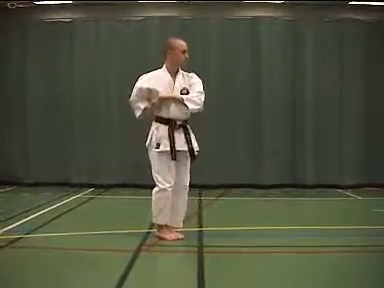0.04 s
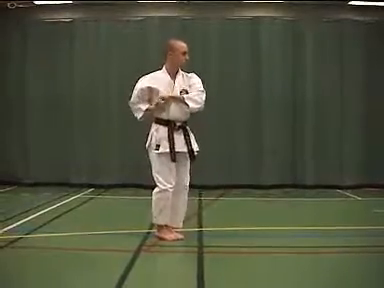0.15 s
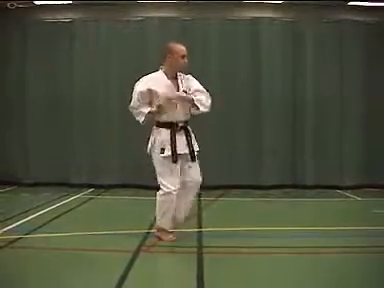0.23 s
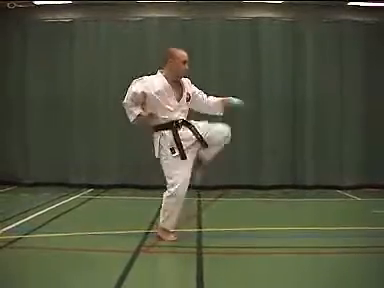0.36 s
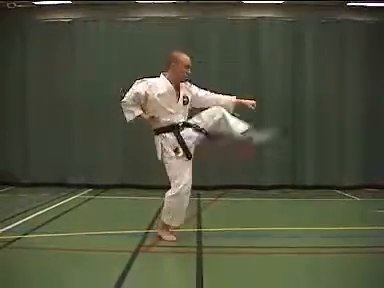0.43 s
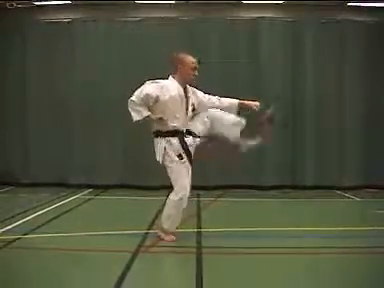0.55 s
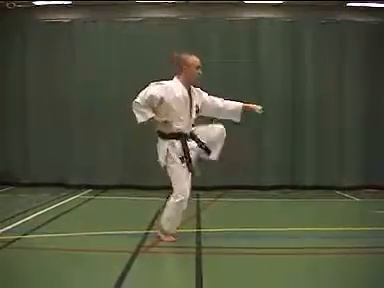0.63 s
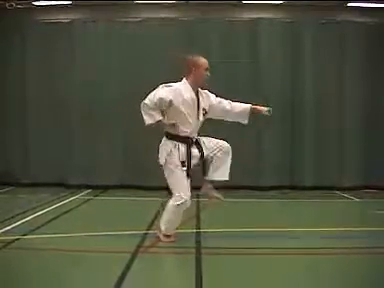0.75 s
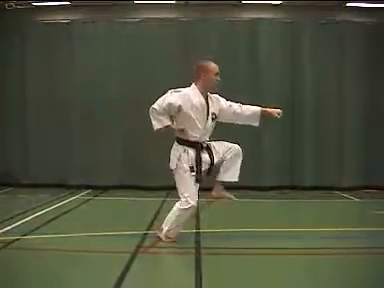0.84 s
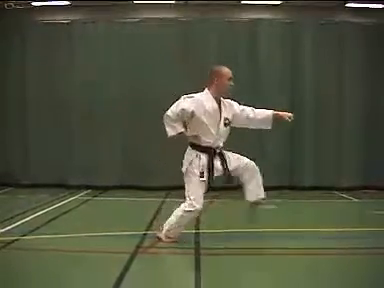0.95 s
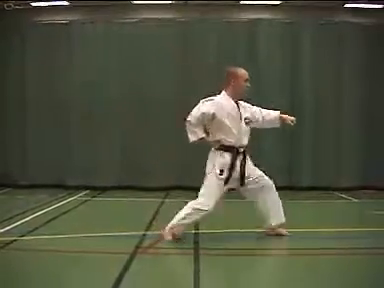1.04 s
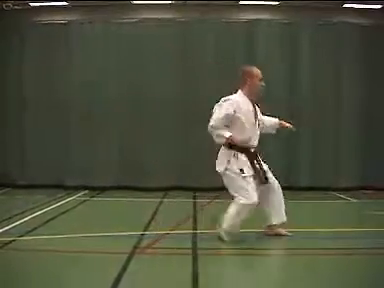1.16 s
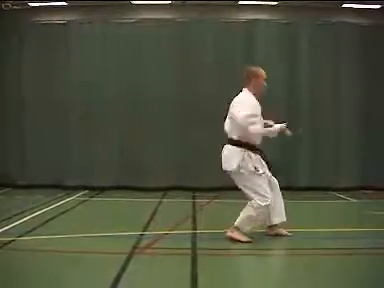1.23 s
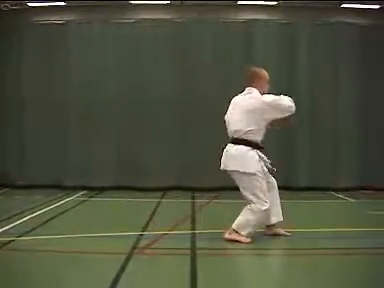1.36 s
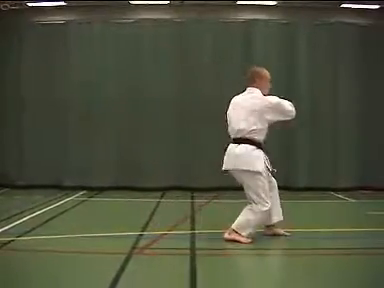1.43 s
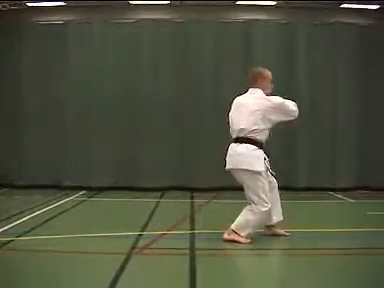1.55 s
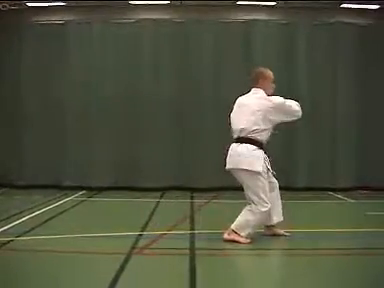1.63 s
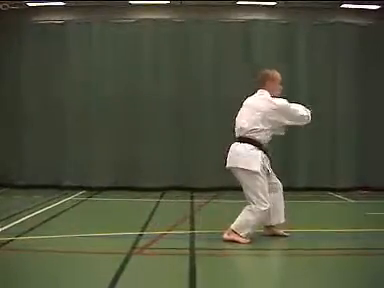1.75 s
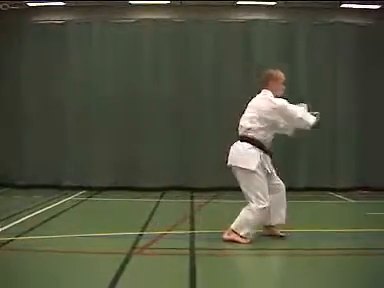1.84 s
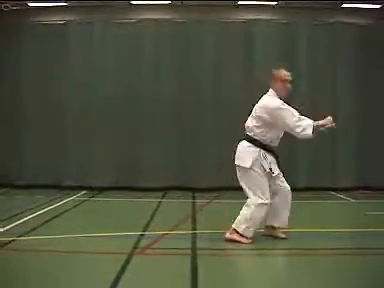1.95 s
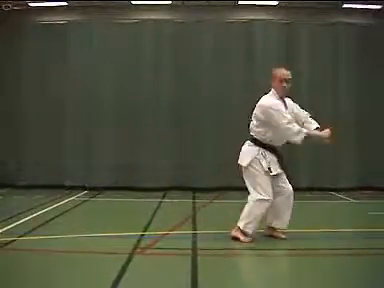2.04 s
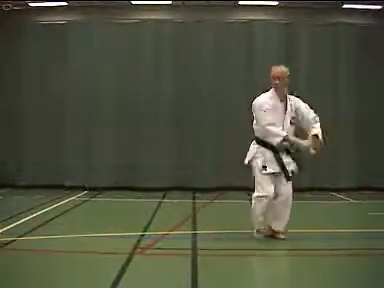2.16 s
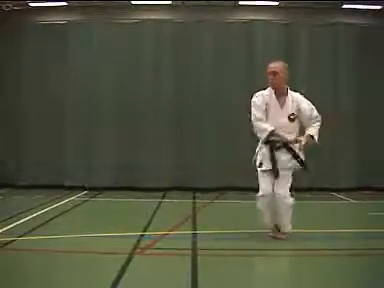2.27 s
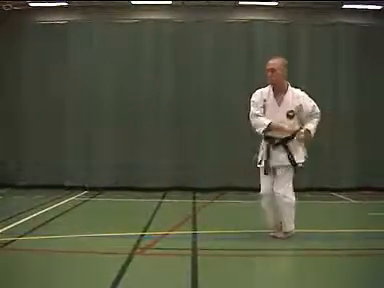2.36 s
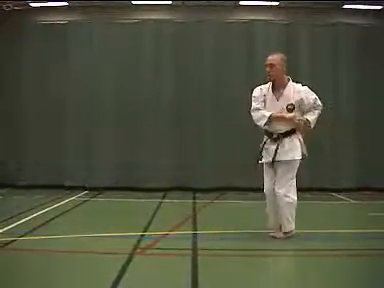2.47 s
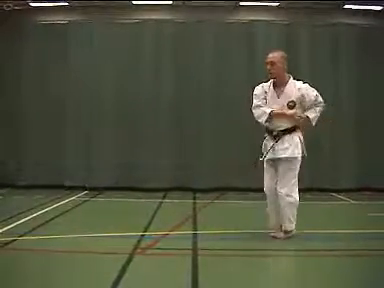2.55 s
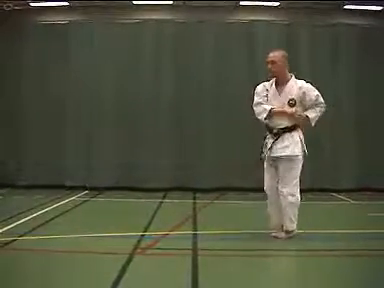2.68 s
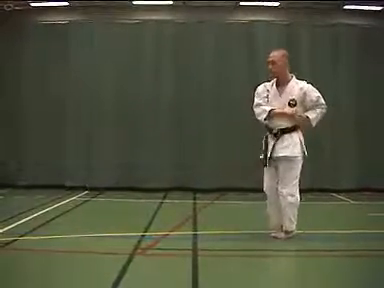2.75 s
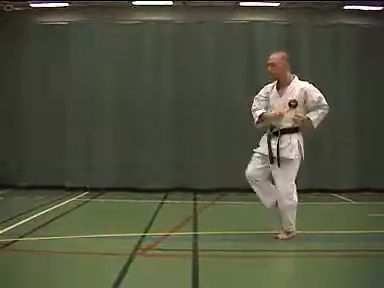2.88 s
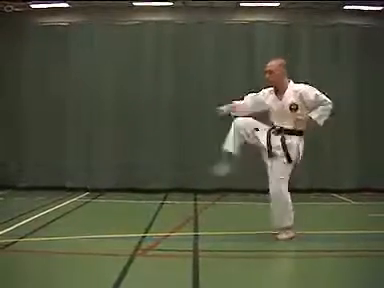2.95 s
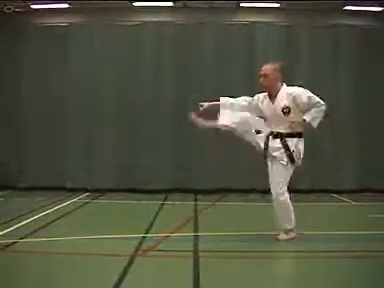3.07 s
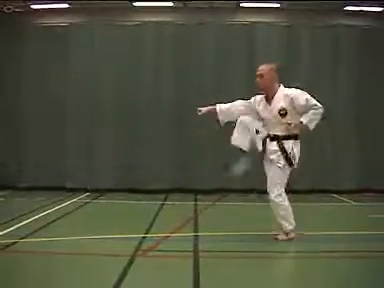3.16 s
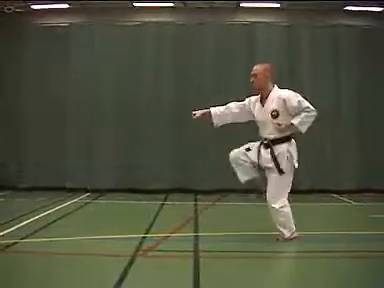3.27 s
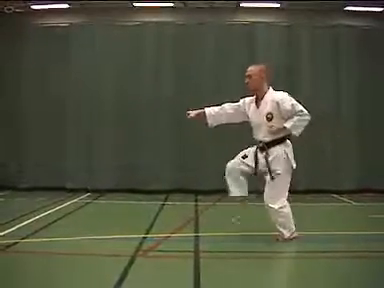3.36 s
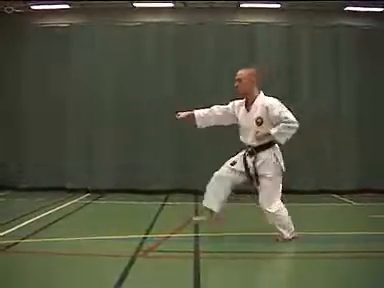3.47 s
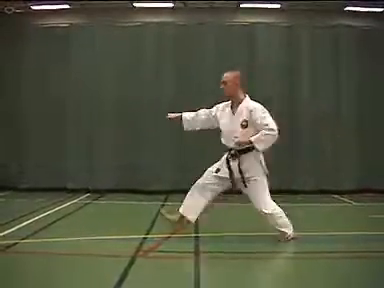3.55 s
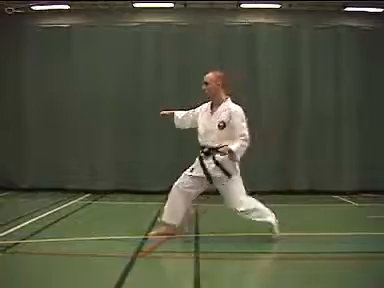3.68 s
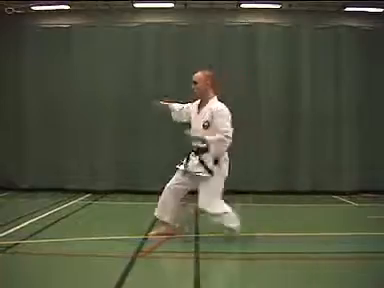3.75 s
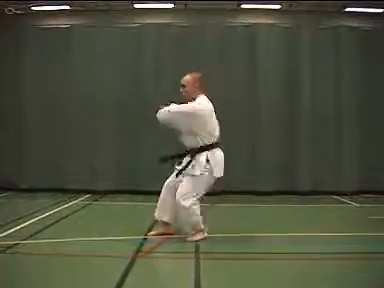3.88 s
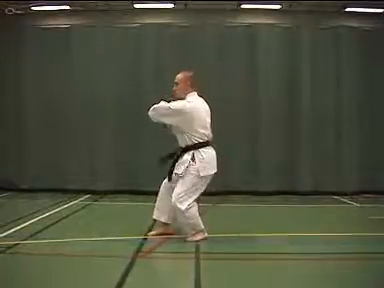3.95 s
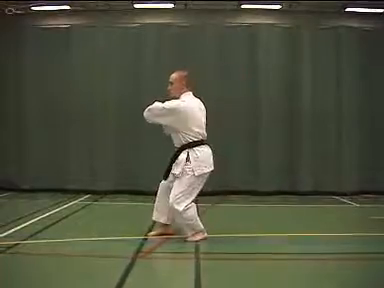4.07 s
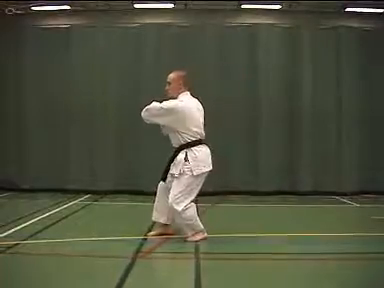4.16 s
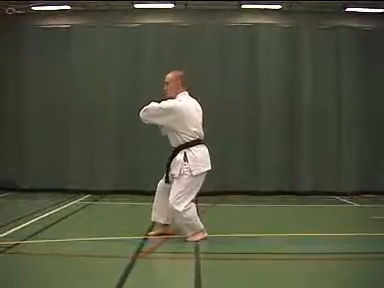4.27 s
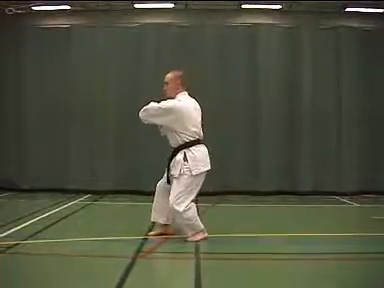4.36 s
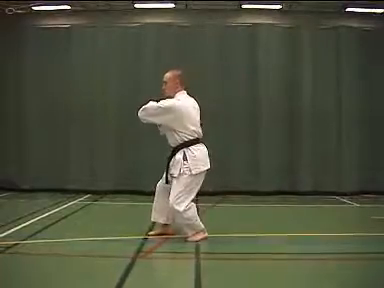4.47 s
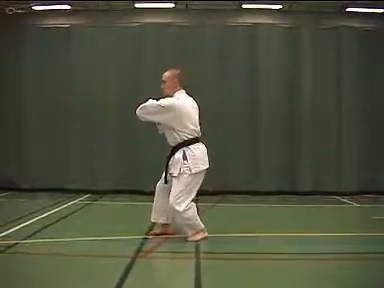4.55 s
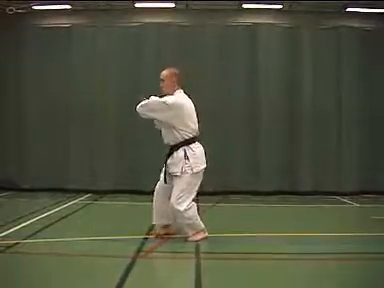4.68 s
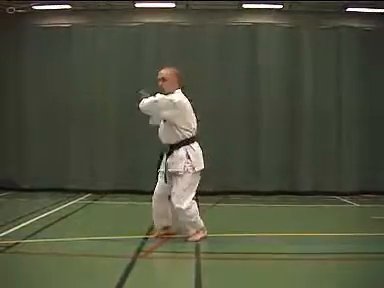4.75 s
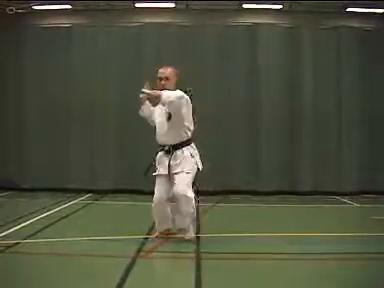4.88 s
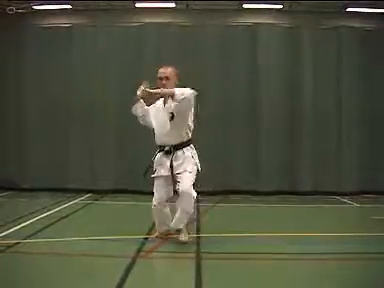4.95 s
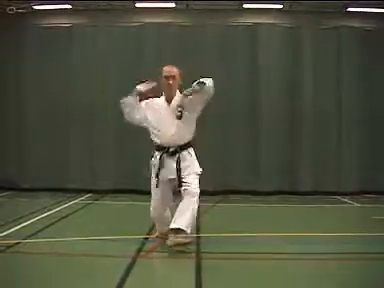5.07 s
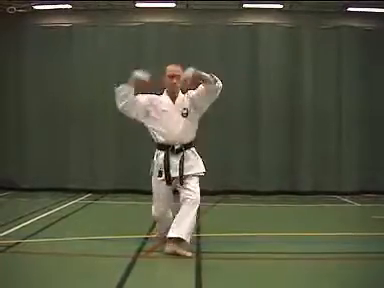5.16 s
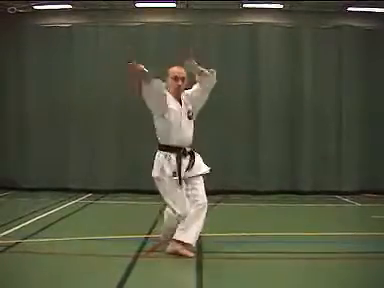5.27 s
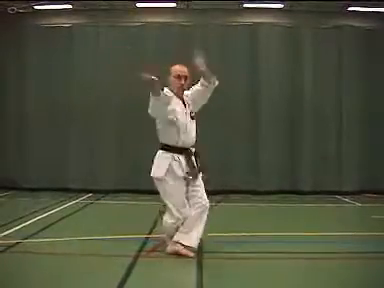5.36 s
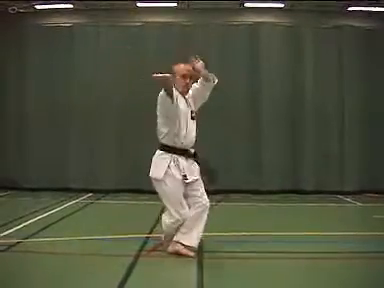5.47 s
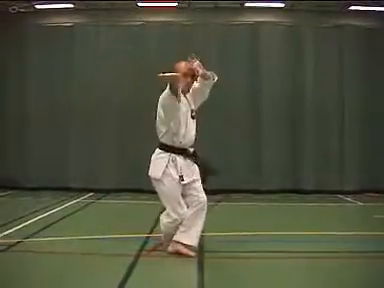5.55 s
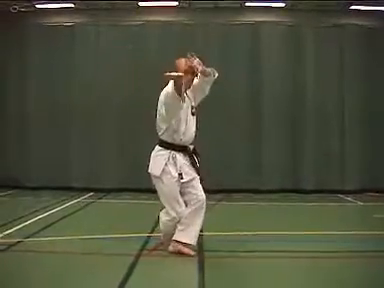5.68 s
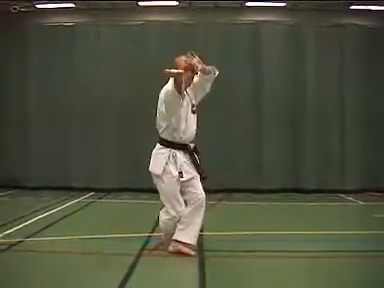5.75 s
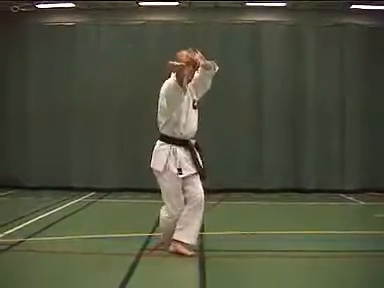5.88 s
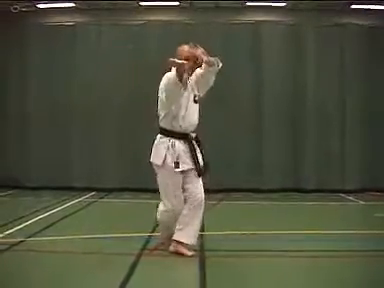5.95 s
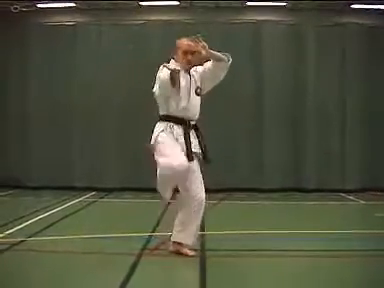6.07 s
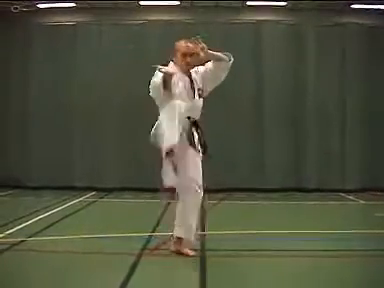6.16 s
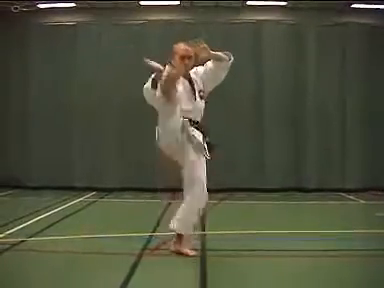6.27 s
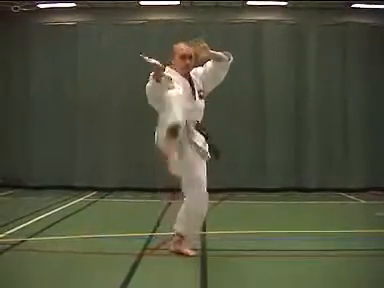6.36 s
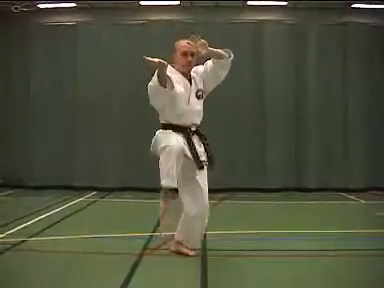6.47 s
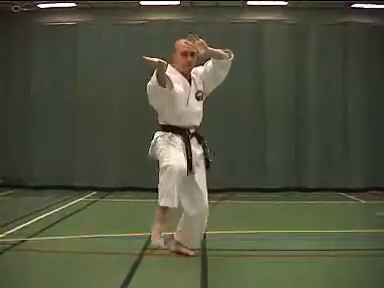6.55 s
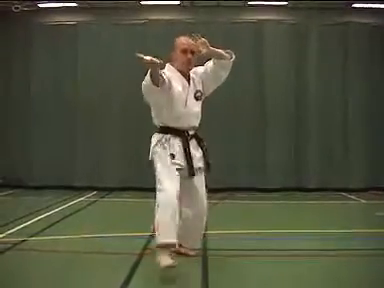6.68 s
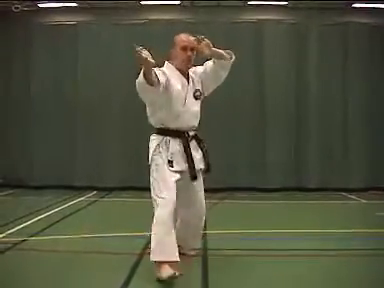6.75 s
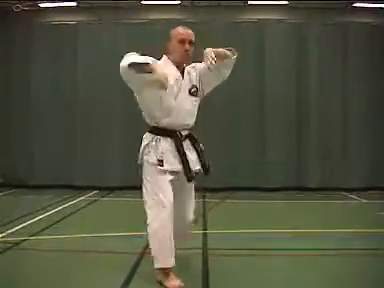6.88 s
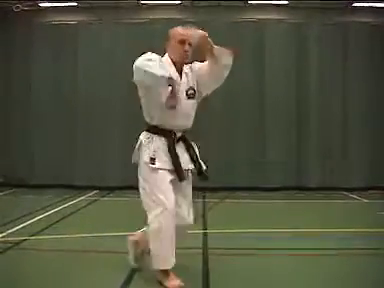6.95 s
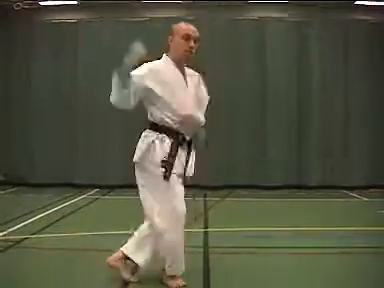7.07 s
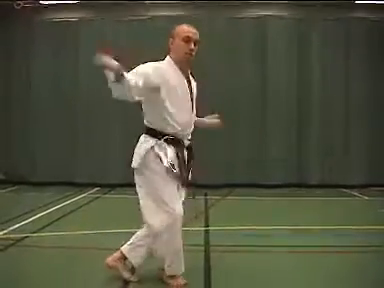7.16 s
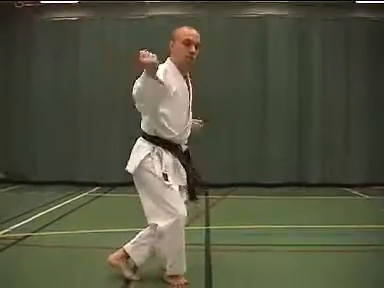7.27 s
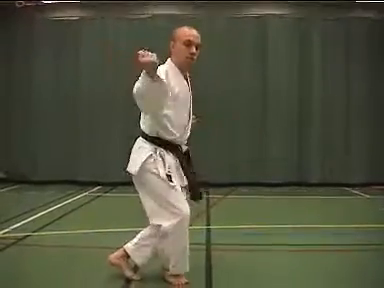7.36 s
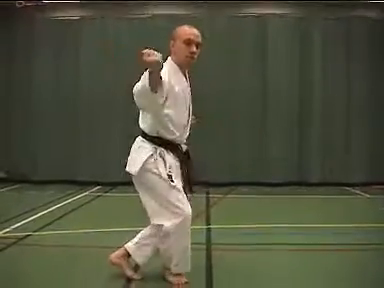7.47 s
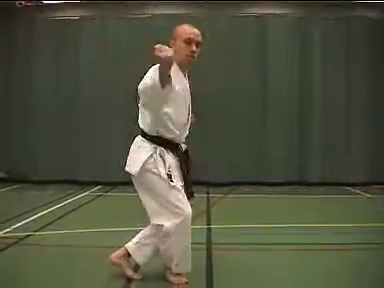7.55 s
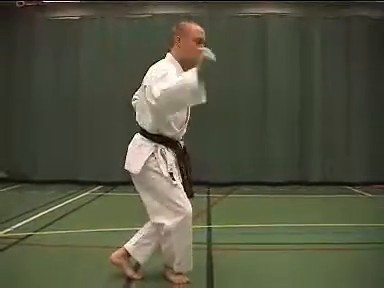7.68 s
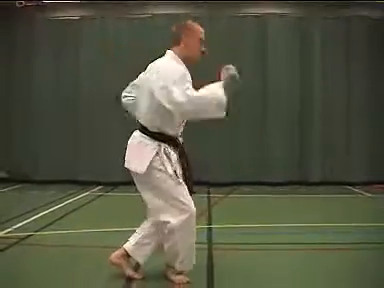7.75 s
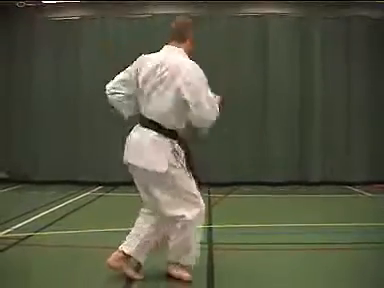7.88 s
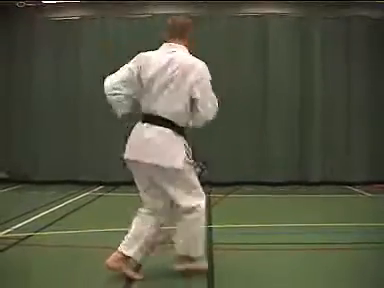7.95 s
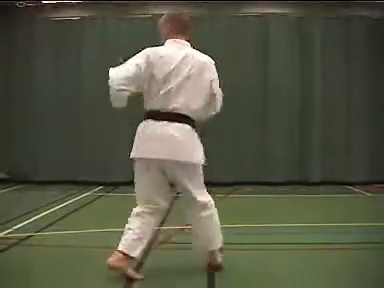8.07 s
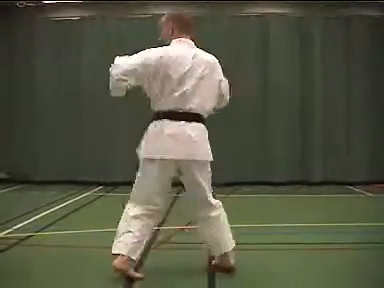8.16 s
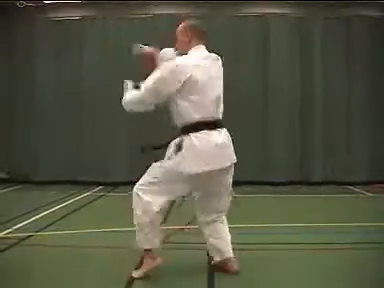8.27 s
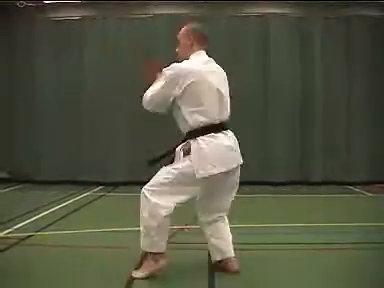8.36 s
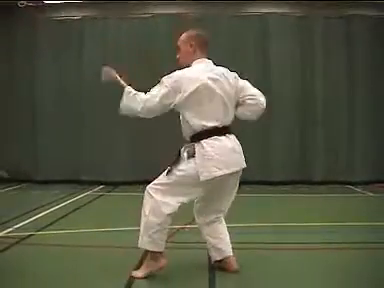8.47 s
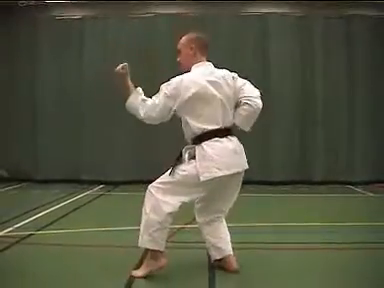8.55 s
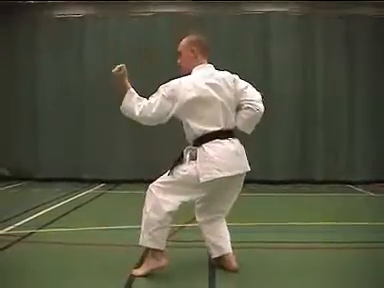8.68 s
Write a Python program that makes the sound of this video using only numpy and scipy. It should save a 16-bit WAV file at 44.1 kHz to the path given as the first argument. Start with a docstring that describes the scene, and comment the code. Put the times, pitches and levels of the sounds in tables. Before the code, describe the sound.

Someone practises martial arts forms in an echoing gymnasium: cloth whooshes and cracks, feet thump and slap, a quiet ventilation rumble underneath.

```python
"""Cotton swishes and snaps, bare feet thud and slap: a karateka runs through a kata in a large sports hall.
Swishes are random clicks and noise shaped by limb speed; snaps and slaps are tight noise bursts ringing air pockets.
Thuds are a damped bounce of the sprung floor plus a heel knock; an elbow strikes the palm twice.
The hall adds a few early echoes and, after a short gap, a dense tail.
Shaped noise makes the ventilation rumble and a faint motor whine."""
import sys
import numpy as np
from scipy import signal
from scipy.fft import rfft, irfft
from scipy.io import wavfile

SR = 44100
rng = np.random.default_rng(int(sys.argv[2]) if len(sys.argv) > 2 else 0)


def int16_out(signal):
    """Quantize to a 16-bit WAV file."""
    q = np.round(np.clip(np.atleast_2d(signal).T, -1, 1) * 32767)
    wavfile.write(sys.argv[1], SR, q.astype(np.int16))


N = 384552

# bright spectrum of taut or creasing cloth: f/Hz, level/dB
CRACKLE_SPECTRUM = [(300, -12.5), (1200, -22), (2200, 0.5), (4000, -3.5), (6500, -11), (10000, -15),
                    (15000, -24)]


def gain_of(db):
    """Decibels to amplitude."""
    return 10 ** (np.asarray(db) / 20)


def evened(x):
    """Scales x to rms 1."""
    return x / np.sqrt(np.mean(x ** 2) + 1e-20)


def read(points, f_hz):
    """Interpolates a table of (f/Hz, value) on a log-frequency axis."""
    table_hz, value = np.transpose(points)
    return np.interp(np.log(f_hz + 1), np.log(table_hz + 1), value)


def add(mix, at_s, sound):
    """Mixes a sound in at a time, trimmed to the mix."""
    start = round(at_s * SR)
    sound = sound[..., max(-start, 0):]
    part = mix[..., max(start, 0):][..., :sound.shape[-1]]
    part += sound[..., :part.shape[-1]]


def coloured(x, points):
    """Filters x by a spectrum of (f/Hz, level/dB)."""
    f_hz = np.fft.rfftfreq(len(x), 1 / SR)
    return irfft(rfft(x) * gain_of(read(points, f_hz)), len(x))


def swishes(flaps_per_s=260, grain_db=4.5, smooth=0.022, waft_db=-11, send_db=-2,
            creases_per_s=60, crease_db=-9):
    """Large and small folds of cotton flap at random, rub and push air, swelling with limb speed."""
    # limb sweeps: top speed t/s, flapping level/dB, rise/s, fall/s, flapping f/Hz, rubbing level/dB
    moves = [(.47, -40.5, 0.071, 0.096, 620, -50.5), (.58, -34, 0.022, 0.15, 640, -48.5),
             (1.12, -30, 0.015, 0.025, 397, -57), (1.43, -32.5, 0.2, 0.15, 750, -49),
             (2.28, -55, .1, 0.13, 605, -55.5), (2.98, -45, 0.048, 0.094, 630, -54.5),
             (3.15, -36.5, 0.086, 0.052, 660, -53.5), (3.29, -40.5, 0.16, 0.099, 520, -52.5),
             (3.98, -30, 0.051, 0.027, 294, -46), (4.93, -50, 0.048, .06, 645, -59.5),
             (5.369, -34, 0.083, 0.032, 534, -48), (6.11, -45, 0.047, 0.038, 570, -49.5),
             (6.35, -34.5, 0.06, 0.16, 590, -48), (7.15, -33, 0.057, 0.12, 630, -44.5),
             (8.0, -51, 0.17, 0.068, 596, -56.5), (8.41, -34.5, 0.009, .088, 1610, -41.5),
             (8.49, -29.5, 0.065, 0.071, 565, -44)]
    # hiss of cloth rubbing on cloth: f/Hz, level/dB
    rub_spectrum = [(300, -0.5), (1200, 5), (2200, 5), (4000, 2.5), (6500, -2), (10000, -4.5),
                    (15000, -10.5)]
    # the limb is first drawn back in a slow, soft sweep; moves rising faster than flick_rise_s have less of it
    windup_lead_s, windup_s, windup_db, flick_rise_s = 0.17, 0.13, -16.5, 0.03
    rub_power = 0.59  # rubbing grows more slowly with speed than flapping
    out = np.zeros((2, N))
    t = np.arange(-SR // 2, SR // 2) / SR
    for at_s, flap_db, rise_s, fall_s, flap_hz, rub_db in moves:
        air, fibres = rng.standard_normal((2, len(t)))
        windup_gain = gain_of(windup_db) * min(rise_s / flick_rise_s, 1) ** 2
        windup = windup_gain * np.exp(-((t + windup_lead_s) / windup_s) ** 2)
        speed = np.exp(-(t / np.where(t < 0, rise_s, fall_s)) ** 2) + windup

        flap = np.zeros(len(t))
        for pitch_ratio in (.72, 1, 1.45):
            drive = folds(len(t), flaps_per_s, grain_db) + smooth * air
            flap += pocket(drive, flap_hz * pitch_ratio, q=1.52, top=1.23)
        waft = evened(pocket(air, f_hz=212, q=1.0, top=2.2))
        flap = evened(flap) + gain_of(waft_db) * waft

        fine_folds = folds(len(t), per_s=920, grain_db=4.0)
        rub = evened(coloured(fine_folds + 0.21 * fibres, rub_spectrum))
        crease_clicks = folds(len(t), creases_per_s, grain_db=6.0)
        creases = signal.fftconvolve(crease_clicks, crack(0.0039), "same")
        rub = rub + gain_of(crease_db) * evened(coloured(creases, CRACKLE_SPECTRUM))

        sound = gain_of(flap_db) * speed * flap + gain_of(rub_db) * speed ** rub_power * rub
        add(out, at_s + t[0], np.outer([1, gain_of(send_db)], sound))
    return out


def cloth(q=1.8, snap_send_db=-1):
    """Sleeves and trouser legs pop as they are pulled taut when a limb stops."""
    # suit snaps, and at 7.308 s the far wall's echo of the 7.177 s snap: t/s, body level/dB, length/s, body
    # f/Hz, crackle level/dB re body
    snaps = [(0.327, -38, 0.0038, 1360, -20), (0.468, -40, .002, 915, -13), (0.553, -38, 0.0017, 905, -18),
             (0.5967, -13, 0.0028, 805, -19), (3.038, -35, 0.0056, 955, -6.5),
             (3.1406, -30, 0.00196, 920, -11), (3.16, -42, 0.006, 880, 3),
             (3.2215, -27.5, 0.0045, 580, -24), (3.996, -15.5, 0.0069, 530, -19),
             (4.071, -21, 0.0096, 740, -12), (5.3837, -19, 0.0011, 1000, -11),
             (6.322, -34, 0.0053, 1130, -10), (6.336, -28, 0.013, 850, -12), (6.424, -33, 0.0051, 710, -20),
             (6.478, -18, 0.0087, 815, -6.5), (7.074, -38, 0.007, 647, -13), (7.102, -20, 0.0075, 576, -6),
             (7.114, -14, 0.0084, 920, -6.5), (7.177, -8.5, 0.02, 710, -6),
             (7.308, -22.5, 0.013, 930, -8.5), (8.372, -32.5, 0.0033, 536, -19),
             (8.435, -27, 0.0059, 1100, 0), (8.49, -19.5, 0.011, 630, -11), (8.606, -26.5, 0.005, 644, -18)]
    out = np.zeros((2, N))
    for at_s, body_db, length_s, body_hz, crackle_db in snaps:
        send_db = snap_send_db + wetness(at_s)
        out += blow(at_s, body_db, length_s, body_hz, q, body_db + crackle_db, send_db,
                    CRACKLE_SPECTRUM, top=3.1)
    return out


def wetness(at_s):
    """Hall feed of a snap in dB re its direct sound: the nearer the karateka, the drier."""
    # karateka to microphone: t/s, distance/m
    distance = [(0, 2.87), (3, 11), (5.4, 9.1), (7, 3.43), (8.7, 5.3)]
    even_m = 6.83  # distance of 0 dB
    return 20 * np.log10(np.interp(at_s, *np.transpose(distance)) / even_m)


def feet(rise_s=0.0013, knock_delay_s=0.00409, knock_width_s=0.00041, stiffening=0.48, settle_s=0.0081):
    """The sprung floor bounces, stiffer under the first load, with a sharp knock as the heel bottoms out."""
    # landings: t/s, level/dB, settled floor f/Hz, heel knock level/dB re level, hall send level/dB
    thuds = [(0.566, -21, 65, 3, -5), (1.110, -10, 120.5, 4.5, -4), (1.122, -12.5, 69.6, -18, -1),
             (1.396, -14, 130, -20, -2), (1.419, -10.5, 115, -27, -9.5), (3.721, -11, 104, 4.5, -1.5),
             (3.742, -8, 71, -19, -9.5), (3.947, -16, 113, 7, -0.5), (5.247, -13.5, 101, 6.5, -2.5),
             (5.384, -21, 127.5, 13.5, -7), (6.877, -9.5, 71.5, -37, -13.5), (7.121, -11.5, 101.6, 5, -6),
             (8.289, -30, 69, -17, -1.5), (8.49, -28, 99, -21, -15)]
    floor_t60_s = .075
    out = np.zeros((2, N))
    t = np.arange(SR // 3) / SR
    for at_s, level_db, floor_hz, knock_db, send_db in thuds:
        turns = np.cumsum(floor_hz * (1 + stiffening * np.exp(-t / settle_s))) / SR
        envelope = gain_of(-60 * t / floor_t60_s) * (1 - np.exp(-t / rise_s))
        bounce = np.sin(2 * np.pi * turns) * envelope
        knock = -gain_of(knock_db) * np.exp(-abs(t - knock_delay_s) / knock_width_s)
        thud = signal.lfilter(*signal.butter(2, 62, "high", fs=SR), bounce + knock)
        add(out, at_s, gain_of(level_db) * np.outer([1, gain_of(send_db)], thud))
    return out


def skin():
    """Soles slap or scuff the floor, elbow hits palm: the better the hollow seals, the longer it rings."""
    # slaps; one shielded by the body arrives by way of the hall:
    # t/s, body level/dB, length/s, body f/Hz, resonance Q, sting level/dB, hall send level/dB
    slaps = [(1.125, -18.5, 0.003, 1170, 5.8, -15, 7.5), (1.137, -21, 0.018, 810, 0.97, -33, 8.5),
             (1.4398, -12.5, 0.0066, 1090, 1.35, -13.5, 0), (1.4423, -25, .003, 4330, 6.4, -29, 2.5),
             (2.743, -44.5, 0.013, 1617, 3.7, -52, -5), (3.734, -29, 0.0061, 1610, 4.2, -50, 1),
             (3.766, -25.5, 0.0044, 1500, 2.8, -24, 7), (3.947, -28, 0.0088, 1180, 1.4, -26, -2),
             (3.971, -31, 0.0054, 540, 0.69, -35.5, 27), (5.2561, -46, 0.0087, 2340, 3, -20.5, 2.5),
             (8.169, -40, 0.016, 1523, 2.9, -64, -1)]
    # bright part of a slap: f/Hz, level/dB
    sting_spectrum = [(300, -5), (1200, 12.5), (2200, 12.5), (4000, 3.5), (6500, -1), (10000, -6.5),
                      (15000, -10.5)]
    return sum(blow(*row, sting_spectrum, top=1.03) for row in slaps)


def blow(at_s, body_db, length_s, body_hz, q, bright_db, send_db, bright_spectrum, top):
    """A blow squeezes out a pocket of air and sprays treble; returns direct sound and hall send."""
    out = np.zeros((2, N))
    cluster = crack(length_s)
    # the hall gathers all directions, so it hears the cluster averaged to one smooth pulse
    pulse = signal.unit_impulse(len(cluster), len(cluster) // 4)
    for bus, drive, bus_db in zip(out, (cluster, pulse), (0, send_db)):
        body = gain_of(body_db) * evened(pocket(drive, body_hz, q, top))
        bright = gain_of(bright_db) * evened(coloured(drive, bright_spectrum))
        sound = (body + bright) * np.sqrt(.005 * SR / len(drive))  # levels are rms over 5 ms
        add(bus, at_s - len(sound) // 4 / SR, gain_of(bus_db) * sound)
    return out


def crack(length_s, order=3, uneven_db=7.5, band_hz=330):
    """A tight cluster of tiny impacts, centred in a short window, whose energy lies in uneven bands."""
    t = (np.arange(4096) - 1024) / SR
    window = np.exp(-(2 * t / length_s) ** 2 / 2)
    cluster = rng.standard_normal(len(t))
    bands = rng.uniform(-1, 1, size=200)
    band_position = np.fft.rfftfreq(len(t), 1 / SR) / band_hz
    ripple = gain_of(uneven_db * np.interp(band_position, np.arange(len(bands)), bands))
    # alternately confine it in time and impose the band levels, keeping the phases
    for _ in range(order):
        phase = np.angle(rfft(cluster * window))
        cluster = irfft(ripple * np.exp(1j * phase))
    return cluster * np.exp(-(t / (length_s + .001)) ** 2)


def folds(count, per_s, grain_db):
    """Folds give sparse clicks of random sign: many small, a few large."""
    sign = rng.choice([-1, 1], count)
    chance = rng.random(count)
    size = rng.exponential(1, count)
    return sign * (chance < per_s / SR) * gain_of(grain_db * np.minimum(size, 3))


def pocket(x, f_hz, q, top, bottom=0.26):
    """A damped air pocket: one broad resonance, radiating between bottom and top times its pitch."""
    rung = signal.lfilter(*signal.iirpeak(f_hz, max(q, f_hz / 8000), fs=SR), x)
    rung = signal.lfilter(*signal.butter(2, min(f_hz * bottom, SR / 3), "high", fs=SR), rung)
    return signal.lfilter(*signal.butter(1, min(f_hz * top, SR / 3), fs=SR), rung)


def echoes(x, low_hz=300):
    """Ceiling and walls throw back a few distinct copies, thin in the bass."""
    # first echoes: delay t/s, level/dB
    reflections = [(.0182, -15), (.0215, -15), (.032, -15.5), (.049, -18), (.126, -15.5)]
    out = np.zeros(N)
    thin = signal.lfilter(*signal.butter(1, low_hz, "high", fs=SR), x)
    for delay_s, level_db in reflections:
        add(out, delay_s, gain_of(level_db) * thin)
    return out


def hall(x, gap_s=0.016, build_s=0.00047, tail_db=-22.0):
    """A silent gap, then a dense noise tail whose treble dies first."""
    # reverberation time: f/Hz, t60/s
    hall_t60 = [(60, 1.45), (150, 3), (300, 2.5), (550, 1.84), (1000, 1.32), (2500, 1.23), (5000, 0.88),
                (8000, 0.54), (12000, 0.39), (16000, 0.1)]
    # tail colour: f/Hz, level/dB
    hall_colour = [(40, 16.5), (75, 2.5), (115, 2), (165, 0.5), (260, 0.5), (500, 0.5), (1200, -3),
                   (3000, 0), (6000, 3), (15000, 3)]
    t = np.arange(2 * SR) / SR
    f_hz, frame_s, spectrum = signal.stft(rng.standard_normal(len(t)), SR, nperseg=512)
    decay_db = -60 * frame_s / read(hall_t60, f_hz)[:, None]
    shaped = spectrum * gain_of(decay_db + read(hall_colour, f_hz)[:, None])
    tail = signal.istft(shaped, SR, nperseg=512)[1][:len(t)]
    tail *= gain_of(tail_db) * (1 - np.exp(-np.maximum(t - gap_s, 0) / build_s))
    tail /= np.sqrt(SR / 2000)  # tail level is per half millisecond
    return signal.fftconvolve(x, tail)[:N]


def background(air_db=-47):
    """Steady ventilation noise and hiss, with narrow noise bands of hum and motor whine."""
    # ventilation and microphone hiss: f/Hz, level/dB
    air_spectrum = [(20, -19), (45, -2), (75, 1.5), (150, 6), (300, -2.5), (550, -4.5), (1100, -8.5),
                    (1800, -12.5), (3000, -18), (4500, -21), (7000, -25), (11000, -27.5), (15800, -35.5)]
    # hum and motor whine: f/Hz, width/Hz, level/dB
    whine_bands = [(73, 14, -58), (3280, 40, -75), (3644, 120, -74), (4355, 60, -71), (4650, 200, -70),
                   (6230, 240, -71), (6571, 40, -79), (8250, 220, -78), (11480, 350, -77)]
    f_hz = np.fft.rfftfreq(N, 1 / SR)
    power = np.zeros(len(f_hz))
    for centre_hz, width_hz, level_db in whine_bands:
        line = np.exp(-(2 * (f_hz - centre_hz) / width_hz) ** 2)
        power += gain_of(level_db) ** 2 * line / line.mean()
    whine = irfft(rfft(rng.standard_normal(N)) * np.sqrt(power), N)
    air = evened(coloured(rng.standard_normal(N), air_spectrum))
    return whine + gain_of(air_db) * air


def scene():
    """Cloth, feet and skin, heard directly and through the hall, over the background."""
    direct, send = skin() + cloth() + feet() + swishes()
    return (direct + echoes(direct) + hall(send) + background())[None]


def record(dry):
    """The microphone sheds the deepest bass and rounds off the highest peaks; then the band limit."""
    edge_hz, ceiling = 15800, .75
    thinned = signal.sosfilt(signal.butter(1, 25, "high", fs=SR, output="sos"), dry)
    rounded = thinned / (1 + (thinned / ceiling) ** 4) ** .25
    lowpass = signal.firwin(511, edge_hz, window=("kaiser", 9), fs=SR)
    return signal.oaconvolve(rounded, lowpass[None], "same")


dry = scene()
out = record(dry)
int16_out(out)
```